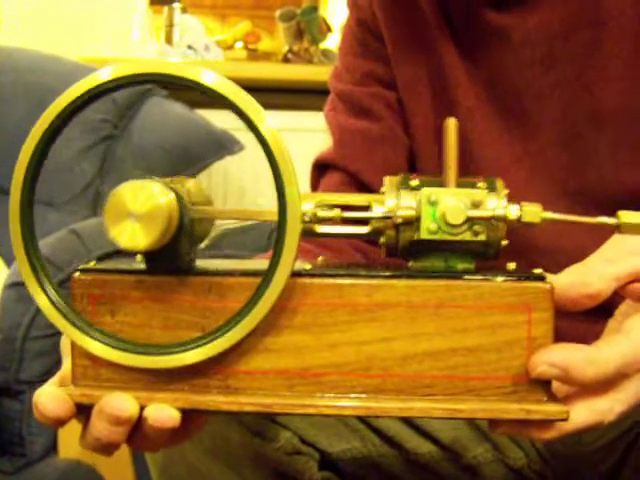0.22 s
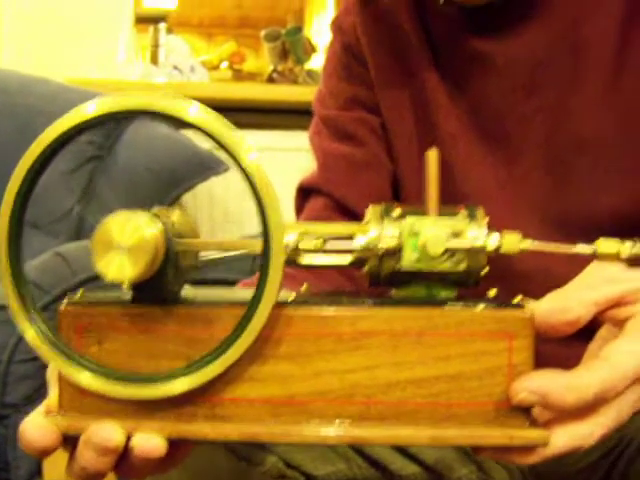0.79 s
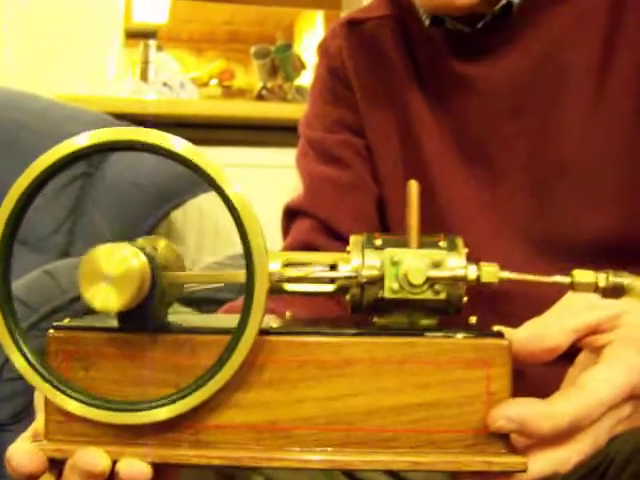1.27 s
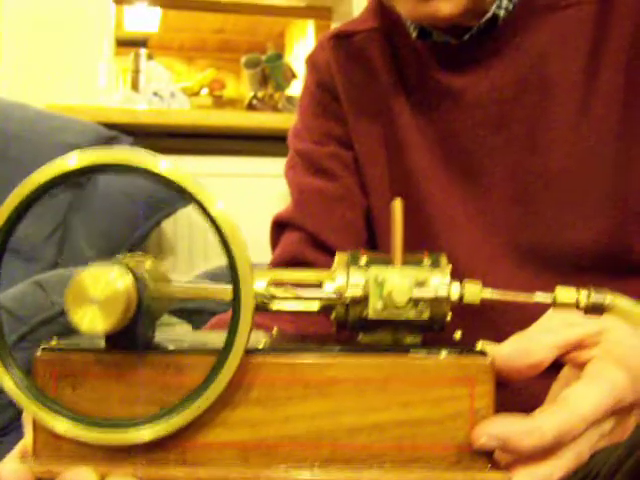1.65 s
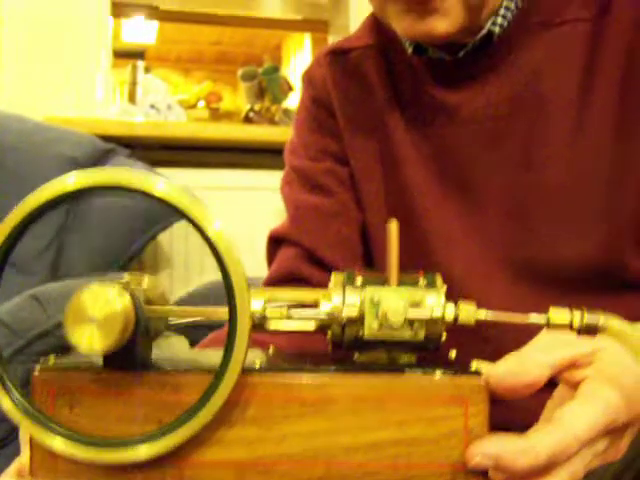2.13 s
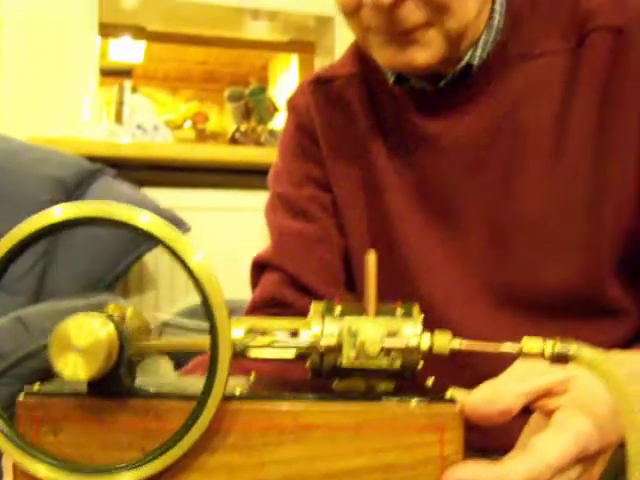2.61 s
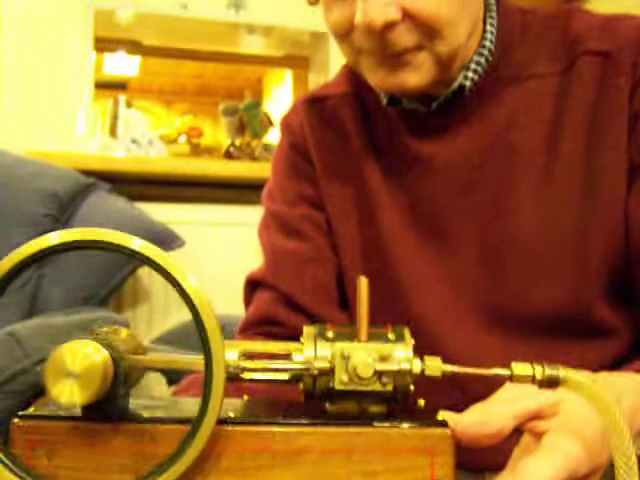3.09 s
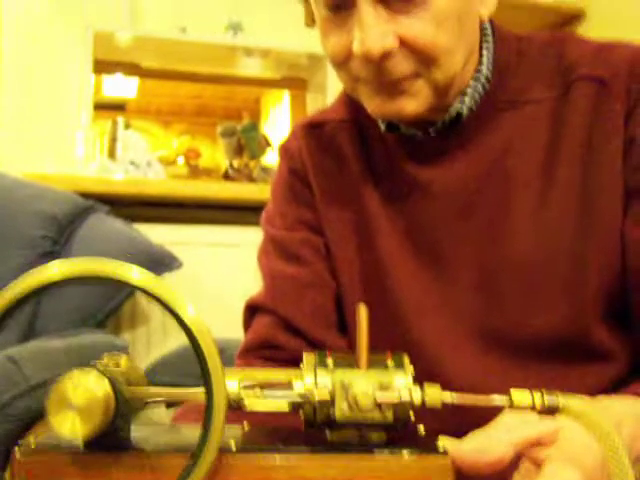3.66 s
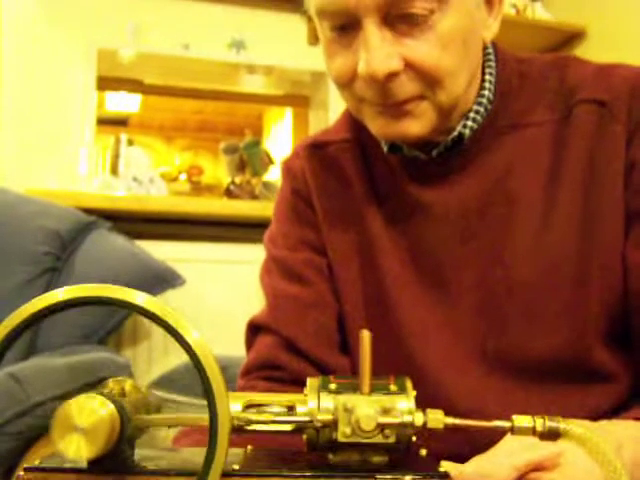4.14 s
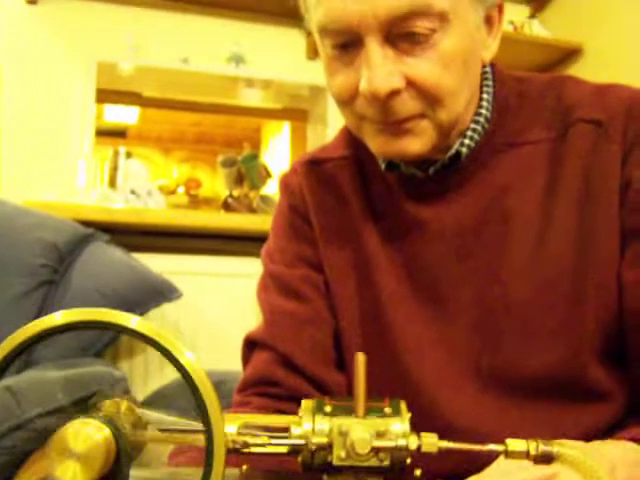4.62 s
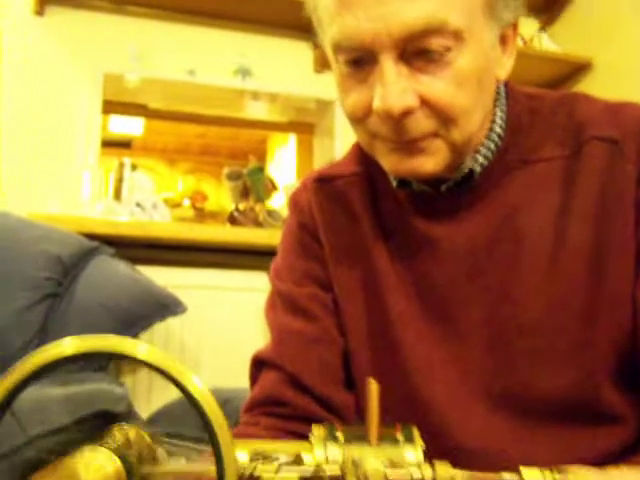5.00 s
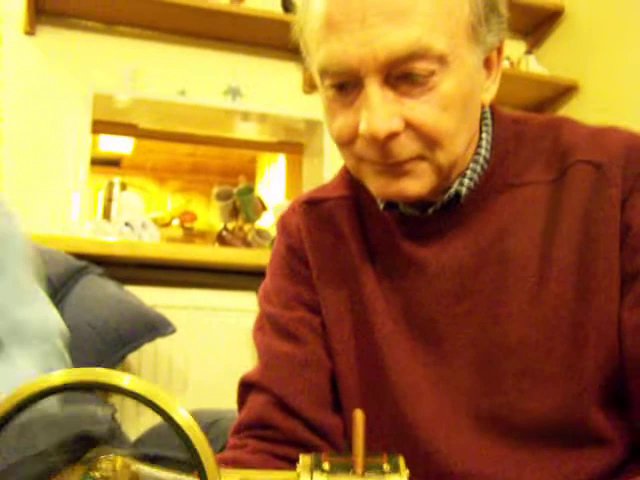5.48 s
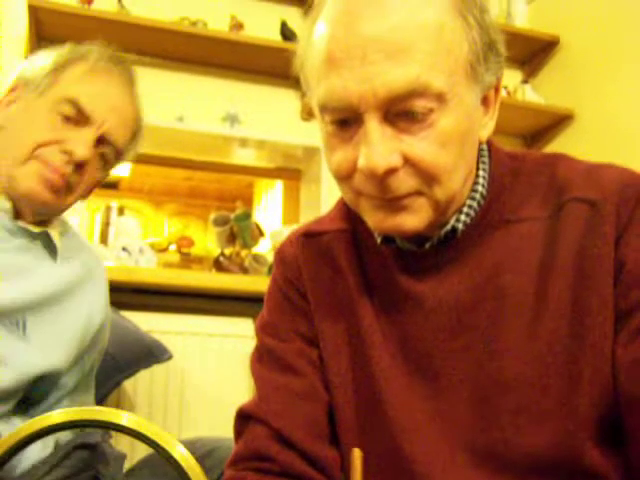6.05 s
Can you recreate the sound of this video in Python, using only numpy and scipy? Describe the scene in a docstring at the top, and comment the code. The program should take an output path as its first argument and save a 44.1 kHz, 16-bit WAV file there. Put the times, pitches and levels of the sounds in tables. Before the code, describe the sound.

Quick, even chuffs and rhythmic knocks from a model steam engine, hissing steadily and shifting slightly in speed in a quiet room.

```python
"""A living room, close to a model steam engine running on a wooden plinth held in the hands.
Its one double-acting cylinder puffs twice a turn, each puff trailing into the hiss of the piston
sweeping steam through a port, while the valve leaks steadily. Play in the crank and rod knocks the
plinth and brass frame at the same angles every turn. The flywheel speeds up, sags and settles, and
the engine dims a little as the microphone tilts away. Room rumble and soft bumps lie underneath."""
import sys
import numpy as np
from scipy import signal
from scipy.fft import rfft, irfft, next_fast_len
from scipy.io import wavfile
from scipy.ndimage import uniform_filter1d, map_coordinates

SR = 44100
rng = np.random.default_rng(int(sys.argv[2]) if len(sys.argv) > 2 else 0)


def persist_wave(psi):
    """Save psi, clipped to +-1, as 16-bit WAV."""
    counts = np.round(np.clip(psi, -1, 1) * 32767).astype(np.int16)
    wavfile.write(sys.argv[1], SR, np.atleast_2d(counts).T)


N = 276066
TIME = np.arange(N) / SR

# the flywheel's tempo: time_s, speed_turns_per_s
FLYWHEEL_SPEED = [(0, 2.998), (1.23, 3.808), (1.94, 3.809), (2.55, 3.283), (3.17, 3.155), (4.45, 3.54),
                  (6.26, 3.553)]
# tone curves of the room rumble, the valve leak and the exhaust puff: pitch_hz, level_db
RUMBLE_SPECTRUM = [(20, -21), (35, -1), (60, -2), (100, 2.5), (160, -4.5), (300, 0), (700, -2.5),
                   (2000, -34.5)]
LEAK_SPECTRUM = [(150, -27), (600, -19), (1450, -11.5), (1900, -13.5), (2150, -7), (2700, -2.5), (3450, 1),
                 (3800, -1.5), (4300, 1), (5400, -3), (6200, -4), (7500, -7), (8400, -22.5)]
PUFF_SPECTRUM = [(200, -54), (600, -23.5), (1100, -16), (1500, -15.5), (2100, -11.5), (3200, -14),
                 (3780, -10), (4030, 0.5), (4550, -2.5), (4750, -3.5), (5200, -1.5), (5700, -19),
                 (7000, -12), (8300, -30.5)]
# resonances of the passages at the two ends of the cylinder: pitch_hz, width_hz, level_db
OUT_PORT_RESONANCES = [(1810, 270, -13.5), (2135, 170, -7), (2390, 92, -14), (3500, 1900, -14),
                       (4030, 210, -2), (4388, 286, 1.5), (5894, 500, -8), (7510, 560, -17)]
BACK_PORT_RESONANCES = [(1795, 100, -18), (2090, 84, -12), (2304, 88, -11.5), (3480, 84, -13),
                        (4107, 160, -5.5), (4454, 160, 1), (4920, 260, -14), (6400, 260, -12),
                        (6720, 220, -14), (7580, 850, -24)]
# hits where the slack is taken up in each turn: angle_turns, scatter_turns, plinth_db, frame_db, rod_db
SLACK_HITS = [(-.001, 0.00065, -23.5, -36, -35), (.01, 0.0022, -40, -43.5, -32),
              (.025, .0015, -31.5, -34.5, -34.5), (.075, .002, -31.5, -20, -28.5),
              (0.093, .002, -38, -35, -38.5), (0.128, .003, -50.5, -40, -41.5),
              (.192, .003, -38.5, -26, -43), (.215, .003, -40.5, -27.5, -23),
              (0.419, 0.0044, -50, -39.5, -40), (.468, .003, -48, -56.5, -51.5),
              (.543, .0025, -46.5, -42.5, -34), (.574, .002, -44.5, -45.5, -35.5),
              (.621, 0.0022, -51.5, -23.5, -35)]
# ring of the wooden plinth, the brass frame and the connecting rod: pitch_hz, level_db, t60_s
PLINTH_MODES = [(158, -20.5, 0.041), (324, -11, 0.029), (426, -6, 0.021), (510, -3.5, 0.044),
                (599, -2, 0.033), (695, -4.5, 0.035), (938, -9, 0.04), (1015, -7.5, 0.047),
                (1153, -13, 0.058)]
FRAME_MODES = [(944, -10, 0.025), (1095, -12, 0.039), (1254, -7.5, 0.03), (1636, 0.5, 0.022),
               (1713, -1.5, 0.033), (2029, -8, 0.046), (2980, -8.5, 0.055), (3480, -9.5, 0.13)]
ROD_MODES = [(2157, 2.5, 0.018), (2600, -0.5, .035), (2837, -2, 0.022)]
# soft bumps of the hands: start_s, level_db
HANDLING_BUMPS = [(.3, -54), (3.42, -51.5)]
# early reflections off nearby surfaces: delay_s, level_db
REFLECTIONS = [(.0041, -27.5), (.0067, -20.5), (.0093, -19.5), (0.0123, -28.5)]
# length of the room's tail: pitch_hz, t60_s
ROOM_DECAY = [(200, 0.69), (2000, 0.61), (8000, 0.86)]

FIRST_KNOCK_S, RING_SAMPLES = 0.0752, SR // 16
# how far steam pressure, crank load and rod load run ahead of the heavy flywheel's speed
STEAM_LEAD_S, CRANK_LEAD_S, ROD_LEAD_S = 0.32, 0.3, 0.78
# swell with drive, in dB per turn a second
HISS_GROWS_DB, KNOCK_GROWS_DB, CLACK_GROWS_DB, TICK_GROWS_DB = 3, 3.2, 2.5, 1.5
# random spread from turn to turn
PUFF_VARY_DB, KNOCK_VARY_DB, CLACK_VARY_DB, TICK_VARY_DB = 0.5, 0.5, 1.34, 2.05
SWEEP_SKEW, SWEEP_SHARPNESS = 1.25, 0.9  # the piston's flow peaks a little after mid-stroke
PITCH_ARCH = 0.035  # share by which the hiss rises as the piston speeds up
TILT_START_S, TILT_LENGTH_S, OFF_AXIS_DB = 1.3, 4.5, -0.83


def amp(db):
    """Decibels to gain."""
    return 10 ** (np.asarray(db) / 20)


def unit(x):
    """Scale to rms 1."""
    return x / np.sqrt(np.mean(x ** 2) + 1e-20)


def along(points, hz):
    """Read a curve of (pitch_hz, value) points on a log axis."""
    pitches, values = np.transpose(points)
    return np.interp(np.log(hz + 1), np.log(pitches), values)


def wobble(rate_hz):
    """A smooth random drift with rate_hz knots a second."""
    return map_coordinates(rng.standard_normal(int(N * rate_hz / SR) + 4), [TIME * rate_hz])


def filtered(x, response):
    """Equalise x with a gain given as a function of frequency."""
    size = next_fast_len(N + SR // 2)
    return irfft(rfft(x, size) * response(np.fft.rfftfreq(size, 1 / SR)), size)[:N]


def noise(spectrum, rough_db=0):
    """Coloured noise of rms 1; roughness makes it sputter within milliseconds."""
    jet = rng.standard_normal(N) * amp(rough_db * wobble(700))
    return unit(filtered(jet, lambda hz: amp(along(spectrum, hz))))


def add(track, start_s, sound):
    """Mix a sound into the track."""
    start = round(start_s * SR)
    if 0 <= start < N:
        track[start:start + len(sound)] += sound[:N - start]


def speed():
    """Turns of the flywheel per second."""
    return np.interp(TIME, *np.transpose(FLYWHEEL_SPEED))


def crank_angle():
    """Turns counted from the first knock."""
    turns = np.cumsum(speed()) / SR
    return turns - np.interp(FIRST_KNOCK_S, TIME, turns)


def drive(lead_s):
    """Steam force about its mean, as the speed it would sustain: higher while the flywheel gains."""
    acceleration = uniform_filter1d(np.gradient(speed()) * SR, size=SR // 2)
    sustained = speed() + lead_s * acceleration
    return sustained - sustained.mean()


def off_axis():
    """0 while the microphone faces the engine, 1 once it has tilted away."""
    return np.clip((TIME - TILT_START_S) / TILT_LENGTH_S, 0, 1)


def hiss_gain():
    """The hiss rides the steam pressure and dims a little off axis."""
    return amp(HISS_GROWS_DB * drive(STEAM_LEAD_S) + OFF_AXIS_DB * off_axis())


def room_tone(hum_hz=58):
    """A bed of low rumble with a faint, wavering hum."""
    hum = amp(-66 + 2 * wobble(3.3)) * np.sin(2 * np.pi * hum_hz * TIME + wobble(5.4))
    return amp(-56.5) * noise(RUMBLE_SPECTRUM) + hum


def valve_leak():
    """Steam slips past the valve in an unbroken hiss."""
    return hiss_gain() * amp(-30) * noise(LEAK_SPECTRUM, rough_db=1)


def port_whistle(port, rough_db):
    """Turbulence of rms 1 ringing in the resonances of a steam passage."""
    def response(f):
        peaks = (amp(2 * db) / (1 + 2 * ((f - hz) / width) ** 2) ** 2 for hz, width, db in port)
        return np.sqrt(sum(peaks))

    jet = rng.standard_normal(N) * amp(rough_db * wobble(400))
    return unit(filtered(jet, response))


def stroke(port, opens_turns, attack_turns, fall_db_per_turn, sweep_turns,
           puff_db, grows_db, off_axis_db, port_db, sweep_db):
    """The port opens: the cylinder blows down in a puff, then the piston sweeps out an arch of hiss."""
    turn, open_for = np.divmod(crank_angle() - opens_turns + 1, 1)
    vary_db = PUFF_VARY_DB * rng.standard_normal(int(turn.max()) + 1)[turn.astype(int)]
    opening = np.minimum(open_for / attack_turns, 1) ** 1.5
    blowdown = opening * amp(-fall_db_per_turn * np.maximum(open_for - attack_turns, 0))
    level_db = puff_db + grows_db * drive(STEAM_LEAD_S) + off_axis_db * off_axis() + vary_db
    puff = amp(level_db) * blowdown * noise(PUFF_SPECTRUM, rough_db=1.5)
    travel = np.minimum(open_for / sweep_turns, 1)
    piston = np.abs(np.sin(np.pi * travel ** SWEEP_SKEW)) ** SWEEP_SHARPNESS
    flow = np.hypot(amp(port_db) * blowdown, piston)  # both flows sound the port
    pitch = 1 + PITCH_ARCH * (piston - 0.75)
    hiss = map_coordinates(port_whistle(port, rough_db=-1), [np.cumsum(pitch)], mode="wrap")
    return puff + hiss_gain() * amp(sweep_db + 0.1 * wobble(25)) * flow * hiss


def exhaust():
    """Two chuffs a turn, one from each end of the cylinder, each coloured by its own port."""
    out = stroke(OUT_PORT_RESONANCES, opens_turns=0.0601, attack_turns=0.0607,
                 fall_db_per_turn=110.5, sweep_turns=0.45,
                 puff_db=-21, grows_db=5, off_axis_db=-3, port_db=1.5, sweep_db=-25)
    back = stroke(BACK_PORT_RESONANCES, opens_turns=0.536, attack_turns=0.038,
                  fall_db_per_turn=166.5, sweep_turns=0.54,
                  puff_db=-19, grows_db=2.2, off_axis_db=-0.5, port_db=2.5, sweep_db=-25)
    return out + back


def ring(modes, attack_s=0.00028):
    """A struck part rings in its modes, a little different in level and tuning on every hit."""
    t = np.arange(RING_SAMPLES) / SR
    hz, db, t60 = np.transpose(modes)[:, :, None]
    vary_db, detune = rng.normal(0, 1.1, hz.shape), rng.normal(0, 0.007, hz.shape)
    sign = (-1) ** np.arange(len(modes))[:, None]
    partials = sign * amp(db + vary_db - 60 * t / t60) * np.cos(2 * np.pi * hz * (1 + detune) * t)
    return partials.sum(axis=0) * (1 - np.exp(-t / attack_s))


def linkage(crack_db=-3, crack_t60_s=0.016):
    """Crank and rod take up their slack: dull plinth knocks, cracking frame clacks, ticks in the rod."""
    track, t = np.zeros(N), np.arange(RING_SAMPLES) / SR
    crank = crank_angle()
    turns = np.arange(int(crank[-1]) + 1)
    crank_load = np.interp(turns, crank, drive(CRANK_LEAD_S))
    rod_load = np.interp(turns, crank, drive(ROD_LEAD_S))
    tilt_db = OFF_AXIS_DB * np.interp(turns, crank, off_axis())
    for turn in turns:
        knock_db = KNOCK_GROWS_DB * crank_load[turn] + KNOCK_VARY_DB * rng.standard_normal()
        clack_db = CLACK_GROWS_DB * rod_load[turn] + CLACK_VARY_DB * rng.standard_normal()
        tick_db = TICK_GROWS_DB * rod_load[turn] + TICK_VARY_DB * rng.standard_normal()
        for angle, scatter, plinth_db, frame_db, rod_db in SLACK_HITS:
            late, force = rng.standard_normal(2)
            knock = amp(plinth_db + knock_db) * ring(PLINTH_MODES)
            rasp = np.gradient(rng.standard_normal(len(t)))  # bright edge of metal on metal
            crack = amp(crack_db - 60 * t / crack_t60_s) * rasp
            clack = amp(frame_db + clack_db) * (ring(FRAME_MODES) + crack)
            tick = amp(rod_db + tick_db) * ring(ROD_MODES)
            start_s = np.searchsorted(crank, turn + angle + scatter * late) / SR
            add(track, start_s, amp(tilt_db[turn] + 0.5 * force) * (knock + clack + tick))
    return track


def handling():
    """The hands make soft bumps: short swells of bassy noise."""
    envelope, t = np.zeros(N), np.arange(SR // 4) / SR
    for start_s, level_db in HANDLING_BUMPS:
        add(envelope, start_s, amp(level_db) * t / 0.012 * np.exp(1 - t / 0.013))
    thud = noise([(30, -27), (70, -1), (140, -2.5), (300, -26), (1000, -82)])
    return envelope * thud


def room_reverb(x, wet_db):
    """Quick reflections from nearby surfaces, then the short tail of a furnished room."""
    hz, t, wash = signal.stft(rng.standard_normal(SR // 2), SR, nperseg=256)
    decay = amp(-60 * t / along(ROOM_DECAY, hz)[:, None])
    tail = signal.istft(wash * decay, SR, nperseg=256)[1]
    response = amp(wet_db) * np.pad(tail, (SR // 200, 0)) / np.linalg.norm(tail)  # 5 ms pre-delay
    for delay_s, level_db in REFLECTIONS:
        response[round(delay_s * SR)] += amp(level_db)
    return signal.fftconvolve(x, response)[:N]


def scene():
    """The engine up front with a little room around it, over the low bed, in mono."""
    engine = exhaust() + valve_leak() + linkage()
    return (engine + room_reverb(engine, wet_db=-12) + handling() + room_tone())[None]


def record(dry):
    """The top end rolls off steeply into a hard band limit."""
    corner_hz, top_hz = 8450, 9080
    return filtered(dry[0], lambda hz: (hz < top_hz) / np.sqrt(1 + (hz / corner_hz) ** 60))[None]


dry = scene()
out = record(dry)
persist_wave(out)
```